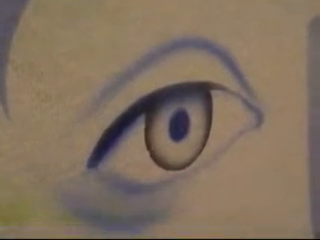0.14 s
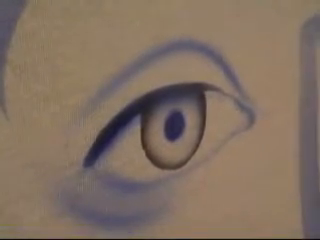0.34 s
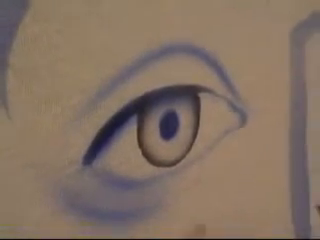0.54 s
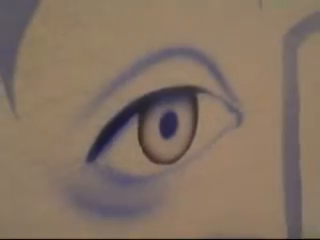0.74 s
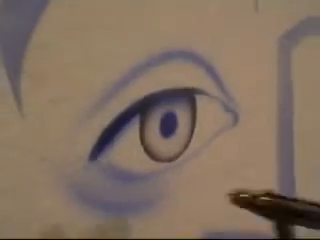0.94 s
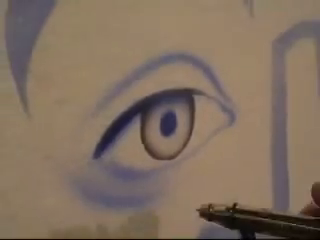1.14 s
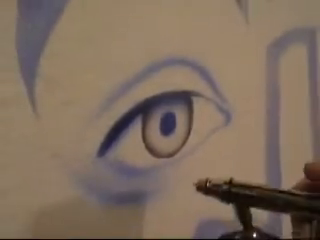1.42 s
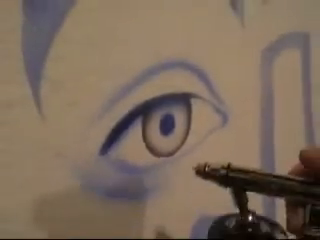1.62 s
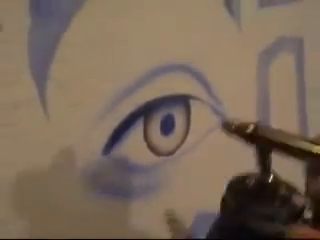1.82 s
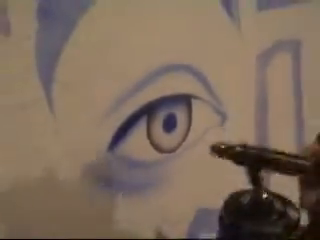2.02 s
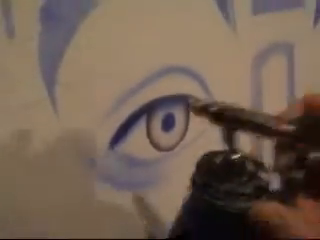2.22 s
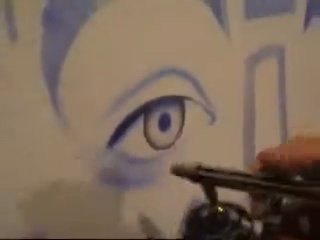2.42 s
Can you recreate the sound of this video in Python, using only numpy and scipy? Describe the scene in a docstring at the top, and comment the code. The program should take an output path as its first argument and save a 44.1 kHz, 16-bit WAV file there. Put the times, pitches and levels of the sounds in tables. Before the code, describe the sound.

Airbrush hiss, bright and close, is already spraying at the start and cuts off at 0.5 s. It returns from 0.9 to 1.3 s, then from 1.8 to almost 2.5 s, opening and closing abruptly. Throughout, a small piston compressor buzzes in the room with throbbing low hum, fluttering thin whine, fast ticks and rattle. Faint low rumble wavers; camcorder gain slowly shifts and the extreme treble is dulled.

```python
"""An airbrush close to a camcorder hisses in three trigger pulls, the first already open: shaped noise, gated.
A small piston compressor runs in the same room: its buzz is cosines on multiples of the shaft speed, its motor
hum throbs against the eighth, a thin whine slides on each turn with valve ticks, and rattle is banded noise.
Low rumble comes and goes at the microphone. The camcorder rides its gain slowly, dips every multiple
of 150 Hz and cuts the top steeply. Source levels are those ahead of the camcorder's gain and filters."""
import sys
import numpy as np
from scipy import signal
from scipy.fft import rfft, irfft, next_fast_len
from scipy.io import wavfile
from scipy.ndimage import uniform_filter1d

SR = 44100
rng = np.random.default_rng(int(sys.argv[2]) if len(sys.argv) > 2 else 0)


def dump_mix(stems):
    """Bounce the given channels to the path in sys.argv[1] as a 16-bit WAV at rate SR."""
    frames = np.atleast_2d(stems).T  # one column per channel
    limited = np.clip(frames, -1, 1)  # hard clip at full scale
    pcm = np.round(limited * 32767).astype(np.int16)
    wavfile.write(sys.argv[1], SR, pcm)


N = 112454
SHAFT_HZ = 25.914   # compressor turns per second
LEFT_RIGHT = np.array([[1], [-1]])


def amp(db):
    """Decibels to gain."""
    return 10 ** (np.asarray(db) / 20)


def rms_one(x):
    """Scale to rms 1."""
    return x / np.sqrt(np.mean(x ** 2) + 1e-20)


def in_time(rows):
    """Columns of a table whose first column is seconds, as curves over the samples."""
    s, *columns = np.transpose(rows)
    return [np.interp(np.arange(N) / SR, s, c) for c in columns]


def at_hz(points, hz):
    """Read a (Hz, value) table on a log frequency axis."""
    p = np.array(points)
    return np.interp(np.log(hz), np.log(np.maximum(p[:, 0], 1)), p[:, 1])


def drift(rate_hz):
    """Slow random wander of spread 1: noise through two equal lowpass poles at rate_hz."""
    step = 40   # samples between computed points
    pole = np.exp(-2 * np.pi * rate_hz * step / SR)
    white = rng.standard_normal(N // step + 2002)
    slow = signal.lfilter([1], [1, -2 * pole, pole * pole], white)[2000:]   # drop the settling
    return np.interp(np.arange(N) / step, np.arange(len(slow)), rms_one(slow - slow.mean()))


def banded(white, spectrum, width, lead, patchy_db, rate_hz, extra_db):
    """Stereo noise in third-octave bands that flicker apart; rms 1 before the flicker and extra_db."""
    hz = np.maximum(np.fft.rfftfreq(N, 1 / SR), 1)
    mid, side = rfft(white) * amp(at_hz(spectrum, hz)) * (hz > 38)
    pair = mid * np.exp(.5j * LEFT_RIGHT * at_hz(lead, hz))
    pair = pair + amp(at_hz(width, hz)) * side * LEFT_RIGHT
    out = 0
    place = 3 * np.log2(hz / 40)   # third-octaves above 40 Hz
    for k in range(28):
        overlap = np.clip(1 - abs(place - k), 0, 1)
        band = irfft(pair * overlap, N)
        out = out + band * amp(patchy_db * drift(rate_hz) + extra_db(40 * 2 ** (k / 3)))
    return out / np.sqrt(np.mean(irfft(pair, N) ** 2))


# Low rumble at the microphone. Each row: time in seconds, level in dB rms before the trim.
RUMBLE_LEVELS = [(0.0, -47), (0.11, -40), (0.32, -53), (0.62, -47), (0.81, -48), (0.93, -47), (1.02, -39),
                 (1.86, -40), (2.55, -48)]
RUMBLE_BAND_HZ, RUMBLE_TRIM_DB = (47, 66.5), -10


def rumble():
    """Narrow low noise, the same in both channels, whose level comes and goes."""
    level_db, = in_time(RUMBLE_LEVELS)
    bandpass = signal.butter(2, RUMBLE_BAND_HZ, "band", fs=SR, output="sos")
    low = signal.sosfilt(bandpass, rng.standard_normal(N))
    return amp(level_db + RUMBLE_TRIM_DB) * rms_one(low)


# Spectrum of the machine's noise. Each row: frequency in Hz, relative density in dB per Hz.
RATTLE_SPECTRUM = [(40, -13), (70, -13.5), (130, -11), (190, -6), (270, -11.5), (350, -3.5), (440, -10.5),
                   (510, -9), (620, -7), (750, -6.5), (900, -11), (1160, -8), (1400, -11.5), (1740, -12.5),
                   (2200, -15.5), (3200, -19.5), (4500, -25), (6100, -20), (7500, -28), (10500, -39),
                   (11800, -55), (12600, -75)]
# Its stereo width. Each row: frequency in Hz, unrelated side against mid in dB.
RATTLE_SIDE = [(60, -18), (200, -19), (600, -20), (1300, -41), (2500, -18.5), (4000, -12.5), (7000, -10),
               (12000, 2)]
RATTLE_DB, REPEATS_ABOVE_HZ = -34.5, 1900
REPEATS = 0.39   # share of the power in the repeating source, which repeats only in the treble


def rattle():
    """Broad machine noise; in the treble part of it is the same on every shaft turn."""
    looped, fresh, other = rng.standard_normal((3, 2, N))
    within_turn = (np.arange(N) % (SR / SHAFT_HZ)).astype(int)
    looped = looped[:, within_turn]
    high = np.fft.rfftfreq(N, 1 / SR) > REPEATS_ABOVE_HZ
    looped = irfft(np.where(high, rfft(looped), rfft(other)), N)
    white = np.sqrt(REPEATS) * looped + np.sqrt(1 - REPEATS) * fresh
    no_lead = [(1, 0), (2, 0)]
    return amp(RATTLE_DB) * banded(white, RATTLE_SPECTRUM, RATTLE_SIDE, no_lead,
                                   patchy_db=1.0, rate_hz=4.9, extra_db=lambda hz: 0)


# The whine over one turn. Each row: share of the turn, nominal pitch in Hz, peak level in dB before the trim.
WHINE_SLIDE = [(0, 5760, -47), (.1, 5830, -42), (.2, 5900, -52), (.33, 6010, -47), (.44, 6060, -37),
               (.54, 6150, -46), (.66, 6300, -45), (.76, 6420, -41), (.88, 6250, -51), (1, 5760, -47)]
# Near echoes, the first, third.. heard in both channels, the others on the right only.
# Each row: delay in seconds, level against the tone in dB.
NEAR_ECHOES = [(.0123, -14), (.0113, -11), (.0201, -9), (.0262, -14)]
WHINE_TRIM_DB = 0.6
# Valve ticks over one turn. Each row: share of the turn, typical impulse height in dB before the bandpass.
VALVE_TICKS = [(.11, -36), (.62, -44), (.95, -43)]
TICK_BAND_HZ, TICK_SPREAD_DB = (2500, 9000), 2.0


def valve_ticks():
    """Bandpassed impulses at fixed places in each turn, each of slightly chance height."""
    clicks = np.zeros(N + SR)
    turns = np.arange(int(N / SR * SHAFT_HZ) + 1)
    for share, height_db in VALVE_TICKS:
        at = ((turns + share) / SHAFT_HZ * SR).astype(int)
        clicks[at] = amp(height_db + rng.normal(0, TICK_SPREAD_DB, len(turns)))
    bandpass = signal.butter(4, TICK_BAND_HZ, "band", fs=SR, output="sos")
    return signal.sosfilt(bandpass, clicks[:N] + 1e-18)


def whine():
    """A thin tone that slides up and drops back on every turn, smeared by near echoes, with valve ticks."""
    lead_in = SR // 10   # samples ahead of the start, so that echoes are already sounding
    turn = np.arange(N + lead_in) / SR * SHAFT_HZ
    share, hz, db = np.transpose(WHINE_SLIDE)
    pitch = np.interp(turn % 1, share, hz)
    # mean pitch on a whole multiple of the shaft speed
    pitch *= np.round(pitch.mean() / SHAFT_HZ) * SHAFT_HZ / pitch.mean()
    level = amp(np.interp(turn % 1, share, db) + WHINE_TRIM_DB)
    tone = level * np.sin(2 * np.pi * np.cumsum(pitch) / SR)
    start = int(int(lead_in / SR * SHAFT_HZ) * SR / SHAFT_HZ)   # skip whole turns

    def echoes(rows):
        return sum(amp(d) * tone[start - int(s * SR):][:N] for s, d in rows)

    left = tone[start:start + N] + echoes(NEAR_ECHOES[::2])
    right = left + echoes(NEAR_ECHOES[1::2])
    return np.array([left, right]) + valve_ticks()


# Compressor buzz. Each row: multiple of the shaft speed, centre level in dB rms.
BUZZ_ORDERS = [(2, -41.5), (3, -58), (4, -43.5), (6, -38), (7, -44.5), (8, -35), (9, -57.5), (10, -50),
               (11, -55.5), (12, -38.5), (13, -41), (14, -41), (15, -47.5), (16, -60), (17, -50.5),
               (18, -58), (19, -53.5), (20, -52.5), (21, -55), (22, -45), (23, -60), (24, -41), (25, -47),
               (26, -55), (27, -51), (28, -48), (29, -55), (30, -49), (31, -50), (32, -43), (33, -54),
               (34, -51), (35, -57), (36, -54), (37, -45.5), (38, -52), (39, -49.5), (40, -49.5),
               (41, -46.5), (42, -54), (43, -44.5), (44, -50), (45, -40.5), (46, -45), (47, -42),
               (48, -70.5), (49, -49.5), (50, -54), (51, -51), (53, -51.5), (54, -48), (55, -58), (56, -57),
               (57, -45.5), (58, -61), (60, -49), (61, -51), (62, -58.5), (64, -54), (65, -58.5),
               (66, -53.5), (67, -52), (68, -50), (69, -58.5), (70, -53), (76, -52.5), (77, -60),
               (87, -59.5)]
ORDER_WAVER_DB = .5
ORDER_LEAD_RAD, ORDER_PAN_DB = .14, .6   # random spread of phase and level between left and right
HUM_HZ, HUM_DB, HUM_DEPTH = 200.06, -30, 0.23   # dB rms without the swell
HUM_PEAK_TURN = 0.59   # share of the turn where the hum is loudest
THROB_S = .132   # moment when hum and eighth multiple are in step, apart from the left-right lead
# Steady tones beside the shaft multiples. Each row: frequency in Hz, level in dB rms.
STEADY_TONES = [(100.04, -57), (138.6, -55), (190.66, -66), (329.26, -50), (346.48, -48), (381.22, -55.5)]


def buzz_and_hum():
    """Shaft multiples as cosines; the motor hum swells once a turn and beats with the eighth multiple."""
    t = np.arange(N) / SR
    half = LEFT_RIGHT / 2
    out = 0
    chances = rng.standard_normal((len(BUZZ_ORDERS), 3))
    for (order, db), (start, lead, pan) in zip(BUZZ_ORDERS, chances):
        if order == 8:
            start = 0
        phase = 2 * np.pi * (order * SHAFT_HZ * (t - THROB_S) + start)
        level = amp(db + ORDER_WAVER_DB * drift(1.6) + half * pan * ORDER_PAN_DB)
        out = out + level * np.cos(phase + half * lead * ORDER_LEAD_RAD)
    swell = 1 + HUM_DEPTH * np.cos(2 * np.pi * (SHAFT_HZ * t - HUM_PEAK_TURN))
    out = out + amp(HUM_DB) * swell * np.cos(2 * np.pi * HUM_HZ * (t - THROB_S))
    for hz, db in STEADY_TONES:
        out = out + amp(db) * np.cos(2 * np.pi * hz * t + rng.uniform(0, 2 * np.pi))
    return np.sqrt(2) * out   # rms to peak


# Trigger pulls. Each row: opens in seconds, closes in seconds.
TRIGGER_PULLS = [(-.1, 0.5284), (0.934, 1.295), (1.824, 2.460)]
OPEN_S, CLOSE_T60_S, TAIL_DB, TAIL_T60_S = 0.0085, 0.017, -45, .08


def trigger_gate():
    """Each pull opens as a squared ramp and falls fast on closing, over a faint slower tail."""
    t = np.arange(N) / SR
    gate = 0
    for opens, closes in TRIGGER_PULLS:
        after = np.maximum(t - closes, 0)
        tail = (after > 0) * amp(TAIL_DB - 60 * after / TAIL_T60_S)
        fall = amp(-60 * after / CLOSE_T60_S) + tail
        gate = gate + np.clip((t - opens) / OPEN_S, 0, 1) ** 2 * fall
    return gate


# Air flow, one list a pull. Each row: time in seconds, level in dB, then the low hiss, the top and the middle
# in dB, of which only the change about the column's mean over time is used.
AIR_FLOW = [
    [(0, -21.5, -12.5, -5, -10), (.1, -23.5, -13, -6, -6.5), (.23, -20, -12.5, -5, -7.5),
     (.3, -19.5, -14.5, -5, -10), (.42, -20.5, -12, -5, -7), (.52, -21, -10.5, -7, -9.5)],
    [(.944, -18.5, -13.5, -5.5, -8), (1.03, -18.5, -13.5, -4.5, -7.5), (1.17, -19, -11, -6, -7),
     (1.23, -18, -13, -5.5, -8), (1.29, -17.5, -12.5, -5, -9)],
    [(1.834, -18, -15.5, -7, -11.5), (1.9, -18, -14, -8.5, -9.5), (2.05, -19, -13.5, -4, -10),
     (2.19, -19, -14.5, -5, -11), (2.32, -17, -12.5, -4, -10.5), (2.455, -19.5, -10.5, -3, -6.5)],
]
# Jet spectrum. Each row: frequency in Hz, relative density in dB per Hz.
JET_SPECTRUM = [(1000, -35), (1700, -10), (2330, -12), (2560, -7.5), (3240, -10), (3960, -8), (4360, -8),
                (4880, -4.5), (6280, -2), (7950, -1.5), (9460, 1), (11500, -8.5), (13600, -29.5)]
# Jet balance. Each row: frequency in Hz, left minus right in dB.
JET_LEFT_OVER_RIGHT = [(2000, -3.5), (4000, -1), (5500, 1.3), (6800, -4), (8000, -2), (10000, 1.5),
                       (13000, 0)]
# Jet stereo width. Each row: frequency in Hz, unrelated side against mid in dB.
JET_SIDE = [(1200, -30), (2200, -55), (4000, -58), (5500, -20), (7000, -17), (9500, -20), (13000, -23)]
# Jet phase between the channels. Each row: frequency in Hz, lead of the left in radians.
JET_LEFT_LEAD = [(0, 0.13), (6370, -0.0), (7320, 0.2), (7670, 0.53), (9130, 0.36), (11500, 0.6),
                 (12000, -0.0), (13400, 0.0)]
JET_LOW_HZ, JET_MID_HZ, JET_TOP_HZ, JET_FLOOR_HZ = 4500, 6100, 8500, 1200


def airbrush():
    """Bright air-jet noise close to the microphone, its tone shifting with the flow, gated by the trigger."""
    level_db, low_db, top_db, mid_db = in_time(np.concatenate(AIR_FLOW))

    def tilt(hz):
        low = (hz < JET_LOW_HZ) * (low_db - low_db.mean())
        middle = (JET_LOW_HZ <= hz < JET_MID_HZ) * (mid_db - mid_db.mean())
        top = (hz > JET_TOP_HZ) * (top_db - top_db.mean())
        return low + middle + top + at_hz(JET_LEFT_OVER_RIGHT, hz) / 2 * LEFT_RIGHT

    jet = banded(rng.standard_normal((2, N)), JET_SPECTRUM, JET_SIDE, JET_LEFT_LEAD,
                 patchy_db=0.85, rate_hz=5.2, extra_db=tilt)
    jet = signal.sosfilt(signal.butter(2, JET_FLOOR_HZ, "high", fs=SR, output="sos"), jet)
    return jet * trigger_gate() * amp(level_db)


MACHINE_PAN_DB = 0.2   # left over right


def scene():
    """Compressor nearly in the middle, airbrush close by."""
    machine = buzz_and_hum() + whine() + rumble()
    machine = machine * amp(LEFT_RIGHT * MACHINE_PAN_DB / 2)
    return machine + rattle() + airbrush()


GAIN_ATTACK_S, GAIN_RELEASE_S, SENSE_HZ = .2, 0.51, 302
GAIN_SLOPE, GAIN_MID_DB = 0.62, -19   # dB of gain taken per dB of level above the middle
NOTCH_SAMPLES, NOTCH_ZERO, NOTCH_POLE = 294, .8, .39   # 294 samples are one cycle of 150 Hz
CUTOFF_HZ = 13800


def automatic_gain_db(dry):
    """Gain that follows the smoothed level above the bass, quicker to turn down than up."""
    hop = 256
    highpass = signal.butter(1, SENSE_HZ, "high", fs=SR, output="sos")
    sensed = signal.sosfilt(highpass, dry.mean(axis=0))
    level = 10 * np.log10(uniform_filter1d(sensed ** 2, size=2048)[::hop] + 1e-9)
    held = [level[0]]
    for db in level:
        time_s = GAIN_ATTACK_S if db > held[-1] else GAIN_RELEASE_S
        held.append(held[-1] + (db - held[-1]) * hop / SR / time_s)
    smooth = np.interp(np.arange(N) / hop, np.arange(len(level)), held[1:])
    return -GAIN_SLOPE * (smooth - GAIN_MID_DB)


def record(dry):
    """The camcorder: slow gain control, comb of dips with unity gain midway between, steep top cut."""
    size = next_fast_len(N + SR // 4)
    z = np.exp(-2j * np.pi * NOTCH_SAMPLES * np.fft.rfftfreq(size))   # delay of one comb cycle
    comb = (1 - NOTCH_ZERO * z) / (1 - NOTCH_POLE * z)
    comb = comb * (1 + NOTCH_POLE) / (1 + NOTCH_ZERO)
    wet = irfft(rfft(dry * amp(automatic_gain_db(dry)), size) * comb, size)[:, :N]
    return signal.sosfilt(signal.ellip(10, 1, 60, CUTOFF_HZ, fs=SR, output="sos"), wet)


dry = scene()
out = record(dry)
dump_mix(out)
```